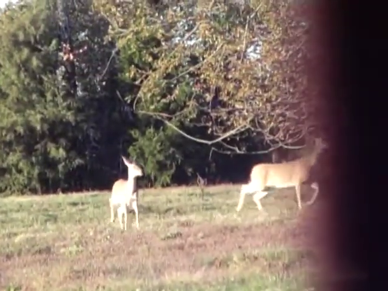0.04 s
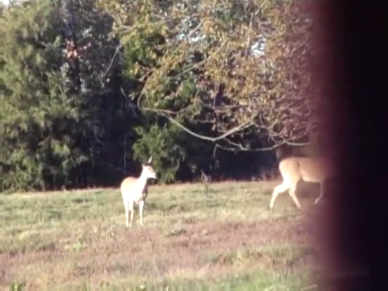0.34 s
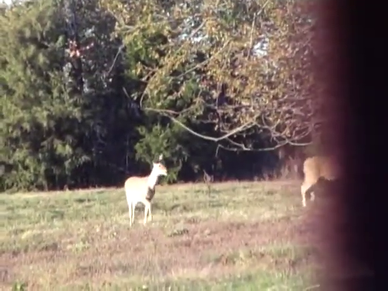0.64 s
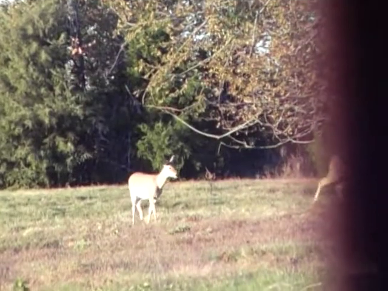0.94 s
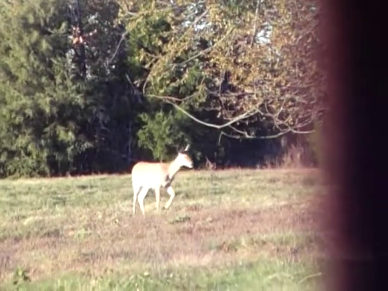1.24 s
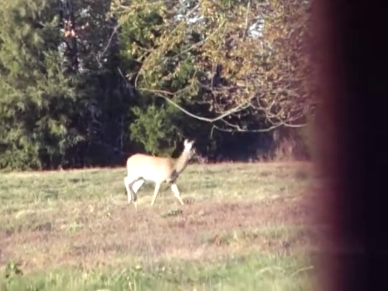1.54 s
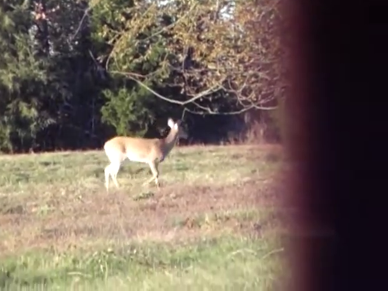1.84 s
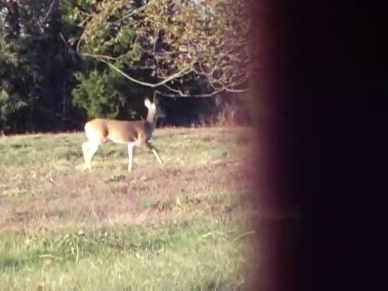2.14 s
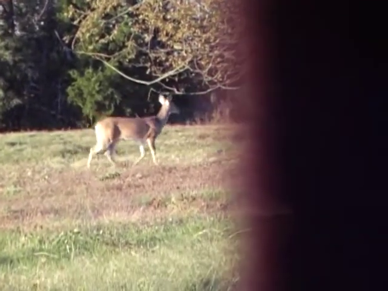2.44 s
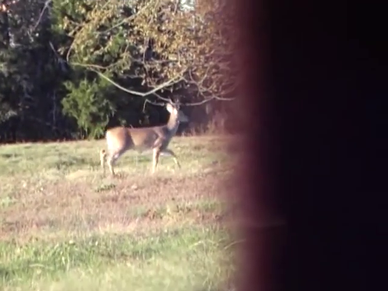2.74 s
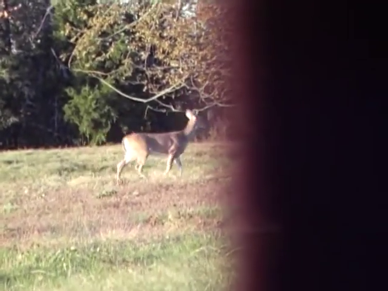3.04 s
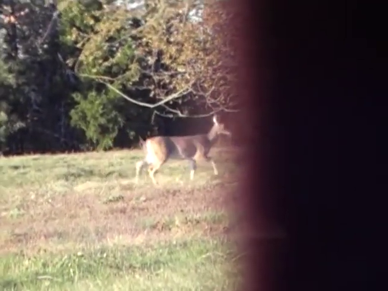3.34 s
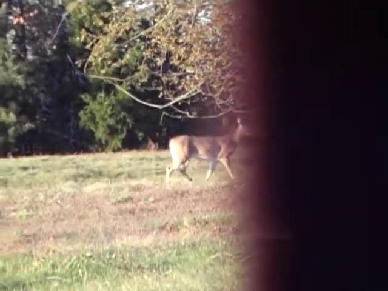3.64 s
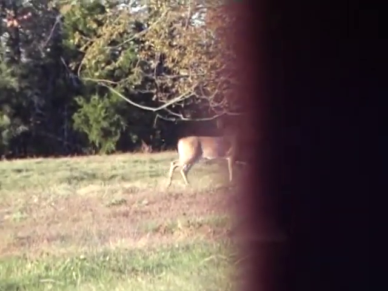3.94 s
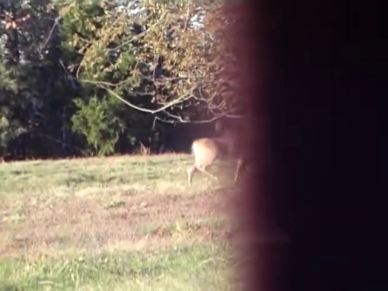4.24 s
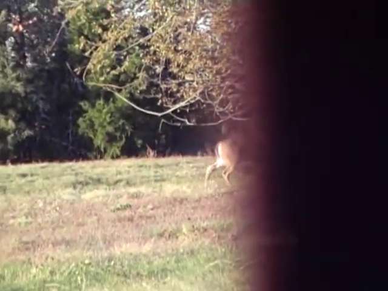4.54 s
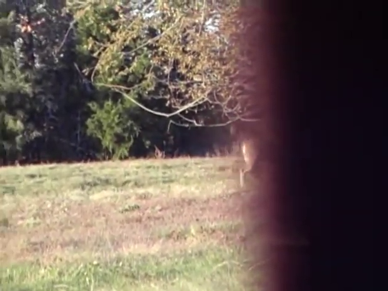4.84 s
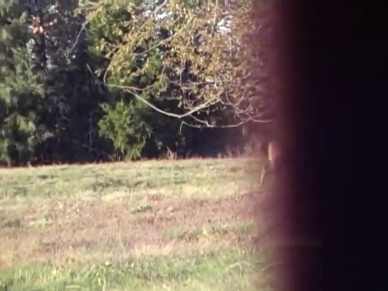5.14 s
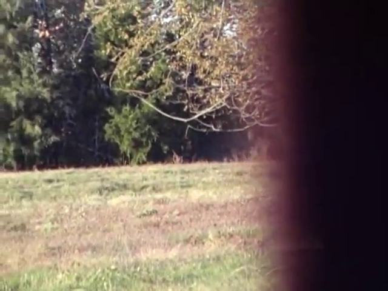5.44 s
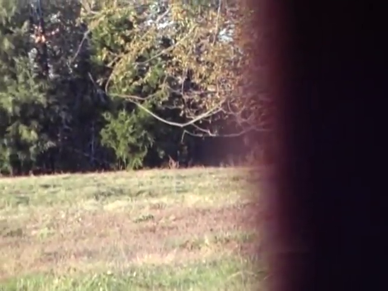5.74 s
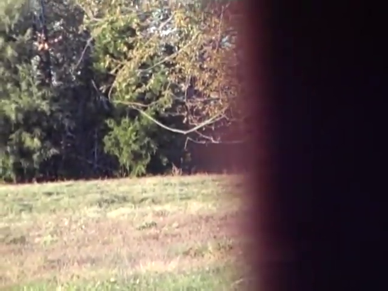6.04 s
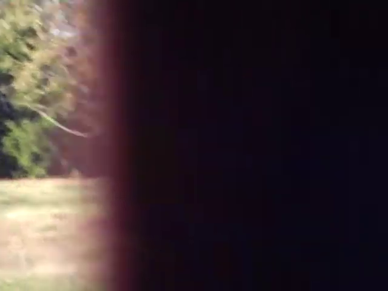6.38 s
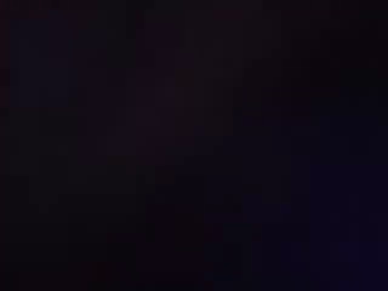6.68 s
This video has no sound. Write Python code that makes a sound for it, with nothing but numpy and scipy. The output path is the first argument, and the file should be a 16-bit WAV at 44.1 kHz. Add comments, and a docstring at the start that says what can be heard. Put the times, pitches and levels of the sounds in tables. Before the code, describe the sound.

Nasal bird calls and faint twittering over a low outdoor rumble, with light camera handling and a closing rustle of tent fabric.

```python
"""Low outdoor rumble, mic hiss and camcorder hum, in a fabric hunting blind at the edge of a wood.
Sleeves stir; hands rub, tick and knock on the camera. A small bird mews three times, its harmonics
sliding through throat resonances. A far bird yelps in the echo of the trunks; others twitter, whistle
and chip in gliding tones. At the end the camera drags along the tent: the weave slips over the mic
ports in a hiss and a scrape, and a crease snaps."""
import sys
import numpy as np
from scipy import signal
from scipy.fft import rfft, irfft, next_fast_len
from scipy.io import wavfile
from scipy.ndimage import map_coordinates

SR = 44100
rng = np.random.default_rng(int(sys.argv[2]) if len(sys.argv) > 2 else 0)


def dump(signal):
    """Clip the signal to [-1, 1] and save it as 16-bit WAV at the path in sys.argv[1]."""
    limited = np.clip(np.atleast_2d(signal).T, -1, 1)
    pcm = np.round(limited * 32767).astype(np.int16)
    wavfile.write(sys.argv[1], SR, pcm)


N = 304731
TIME = np.arange(N) / SR

# still air, mic hiss: f/Hz, gain/dB
AIR_SPECTRUM = [(15, -40), (25, -23), (54, -3.5), (113, -2.5), (146, -3.5), (224, -9.5), (248, -14),
                (310, -12.5), (388, -14.5), (493, -15), (743, -14.5), (852, -16), (897, -17.5), (1220, -12),
                (1500, -33), (1950, -46), (3300, -120)]
HISS_SPECTRUM = [(1000, -4.5), (1500, 4), (2100, 0.5), (3000, -0.5), (4500, 0.5), (6500, -2.5), (7800, -8),
                 (9200, -7.5), (10500, -10.5), (15500, -14)]
# width of air and hiss: f/Hz, side minus mid/dB
AIR_WIDTH = [(60, -19), (160, -15.5), (330, -5.5), (1200, -9.5), (2000, -1), (6000, -4), (9000, 8),
             (11000, 0.5), (15000, -1)]
# camera hum and whine: f/Hz, level/dB
HUM_TONES = [(111, -68), (124, -67.5), (179, -70.5), (841, -66.5)]
# stirring sleeves: t/s, level/dB
SLEEVE_LEVELS = [(0, -65), (.22, -64), (.3, -72), (.6, -80), (.95, -71), (1.2, -63.5), (1.75, -63.5),
                 (1.95, -72.5), (2.12, -64), (2.6, -69), (2.75, -64), (3.7, -67.5), (3.9, -64.5),
                 (5.1, -66.5), (5.55, -72.5), (5.8, -67), (6.2, -68.5)]
# stirring sleeves: f/Hz, gain/dB
SLEEVE_SPECTRUM = [(800, -14), (2000, 2.5), (3000, -4.5), (3900, 3.5), (5500, 0.5), (6600, 2), (7600, -11),
                   (11000, -23), (16000, -24)]
# width of cloth at the mic ports: f/Hz, side minus mid/dB
CLOTH_WIDTH = [(300, -22), (1000, -17), (2500, -102), (4500, -22), (6000, -20.5), (7300, -10), (8500, 8),
               (10000, 3.5), (12000, -0.5), (15000, -1)]
# cloth and casing ticks, body knocks: t/s, peak/dB, f/Hz, t60/s
SHARP_TICKS = [(.2325, -39, 4760, 0.024), (1.047, -40, 1995, 0.019), (1.502, -52, 1710, 0.0093),
               (1.773, -30.5, 4970, 0.014), (1.804, -41, 2800, 0.0083), (5.104, -41, 3660, 0.025),
               (6.2897, -28, 5000, 0.0048), (6.5318, -28, 2450, .004), (6.569, -34.5, 1700, .01)]
BODY_KNOCKS = [(.933, -45.5, 597, 0.023), (1.003, -38.5, 400, 0.024), (1.048, -51, 800, 0.011),
               (1.502, -43, 450, 0.012), (1.52, -41, 412, 0.0068), (2.214, -39.5, 730, 0.017),
               (3.338, -47, 646, 0.019), (6.283, -43, 527, 0.11), (6.414, -34.5, 930, 0.008),
               (6.628, -32.5, 316, 0.029)]
# mews: t/s, length/s, start f/Hz, mid f/Hz, end f/Hz, level before throat/dB, flutter/dB, release/s
MEW_CALLS = [(0.637, .38, 895, 824.3, 774, -41.5, 1.35, 0.025),
             (1.367, .367, 877, 827, 768, -42, 0.8, .022), (5.35, 0.42, 902, 831, 795, -46, 2, 0.12)]
# mewing bird's throat resonances: f/Hz, width/Hz, gain/dB
THROAT_MODES = [(1565, 450, -24), (2410, 110, -20), (2577, 95, -20), (2990, 260, -9), (3273, 166, -3),
                (3960, 400, -26), (4900, 490, -24.5), (5230, 140, -23), (6420, 260, -28)]
# shifting grip: t/s, level/dB
GRIP_LEVELS = [(.8, -70), (1.03, -57.5), (1.2, -56), (1.42, -63), (1.53, -58), (1.9, -82)]
# shifting grip: f/Hz, gain/dB
GRIP_SPECTRUM = [(100, -10), (220, -6), (400, -1), (700, -2), (1100, -9.5), (2500, -23), (6000, -27),
                 (12000, -42)]
# far yelps: t/s, fall/s, top f/Hz, source level/dB
YELP_CALLS = [(.925, 0.045, 1383, -54), (1.218, 0.063, 1450, -47.5), (1.584, 0.083, 1450, -47.5),
              (1.932, 0.22, 1500, -58), (2.319, .19, 1422, -47.5), (2.738, 0.18, 1418, -48.5),
              (3.198, 0.19, 1405, -50.5)]
# rising chips: t/s, level/dB
CHIP_CALLS = [(3.132, -52.5), (3.657, -63), (4.127, -54), (4.604, -57), (5.726, -57)]
# songbird notes: t/s, length/s, start f/Hz, end f/Hz, level/dB, burr/share of pitch
WHISTLE_NOTES = [(2.4, 0.2, 3170, 2940, -64.5, 0.023), (3.349, 0.033, 3060, 3255, -53.5, 0.0072),
                 (3.379, 0.095, 4300, 3910, -47.5, 0.0048), (3.463, 0.033, 2710, 2720, -59.5, 0.0072),
                 (3.492, 0.083, 3350, 2500, -54, 0.032)]
# tent weave hiss, lower scrape: f/Hz, gain/dB
WEAVE_SPECTRUM = [(2060, -28), (3500, -11), (4190, -9.5), (4630, -5), (6020, 0), (7960, -13), (9420, -16),
                  (11700, -21.5), (15500, -39)]
SCRAPE_SPECTRUM = [(120, -45), (200, -24), (237, -11.5), (355, -9.5), (597, -12), (736, -7.5),
                   (1360, -11.5), (1510, -6), (2200, -6), (2470, -7.5), (2820, -4.5), (4160, -4),
                   (4500, -1), (5850, -21), (9900, -120)]
# resonances of air pockets under the cloth, of the camera shell: f/Hz, width/Hz, gain/dB
POCKET_MODES = [(5000, 300, -17), (5500, 220, -18), (6600, 250, -11.5)]
SHELL_MODES = [(1500, 250, -13), (2500, 140, 0)]
# mic ports against the tent: f/Hz, left minus right/dB
PORT_BALANCE = [(3000, -1), (4800, 0), (5500, -3), (7300, -8.5), (9000, 3), (11000, 6.5), (14000, 3)]


def undb(db):
    """Decibels to gain."""
    return 10 ** (np.asarray(db) / 20)


def unit(x):
    """Scale to rms 1."""
    return x / np.sqrt(np.mean(x ** 2))


def noise():
    """White noise."""
    return rng.standard_normal(N)


def walk(rate_hz):
    """Smooth random wander, spread near 1."""
    knots = rng.standard_normal(4096)
    return 1.205 * map_coordinates(knots, [TIME * rate_hz], order=2, mode="wrap")


def decay(t_s, t60_s):
    """Exponential fall, 60 dB per t60."""
    return np.exp(-np.log(1000) * t_s / t60_s)


def fade(times_s, levels_db, edge_s=.0037):
    """Gain along a level curve, silent outside it."""
    inside_s = np.minimum(TIME - times_s[0], times_s[-1] - TIME)
    return undb(np.interp(TIME, times_s, levels_db)) * np.clip(inside_s / edge_s + .5, 0, 1)


def shape(x, spectrum, power=1):
    """Filter by an outline of f/Hz, gain/dB."""
    hz, db = np.transpose(spectrum)
    size = next_fast_len(N)
    bins_hz = np.maximum(np.arange(size // 2 + 1) * SR / size, 1)
    gain = undb(power * np.interp(np.log(bins_hz), np.log(hz), db))
    return irfft(rfft(x, size) * gain, size)[:N]


def resonate(x, hz, width_hz):
    """One resonance, gain 1 at its centre."""
    return signal.lfilter(*signal.iirpeak(min(hz, .45 * SR), max(hz / width_hz, .5), SR), x)


def place(x, pan_db):
    """Pan; positive is left."""
    return x * undb(np.array([[pan_db], [-pan_db]]) / 2)


def ports(common, apart, spectrum, width):
    """Two mic ports: a shared signal plus and minus a side signal."""
    mid = unit(shape(common, spectrum))
    side = shape(unit(shape(apart, spectrum)), width)
    return np.array([mid + side, mid - side])


def background(air_db=-57.5, hiss_db=-66):
    """Outdoor rumble and mic hiss."""
    air = ports(noise(), noise(), AIR_SPECTRUM, AIR_WIDTH) * undb(air_db + .54 * walk(5.12))
    hiss = ports(noise(), noise(), HISS_SPECTRUM, AIR_WIDTH) * undb(hiss_db)
    return air + hiss


def camera_hum():
    """Four tones, wavering in pitch and level."""
    hum = np.zeros(N)
    for hz, db in HUM_TONES:
        gain = np.sqrt(2) * undb(db + 1.13 * walk(5.5))
        hum += gain * np.sin(2 * np.pi * np.cumsum(hz + 1.58 * walk(12)) / SR)
    return hum


def slips(rate_hz, spread_db):
    """Tiny fibre slips at random moments, a few much larger."""
    sizes = undb(spread_db * np.minimum(rng.exponential(size=N), 5))
    return unit(noise() * sizes * (rng.random(N) < rate_hz / SR))


def sleeves():
    """Clothing fibres slip in little fits."""
    rustle = ports(slips(7000, 1.8), slips(6400, 2), SLEEVE_SPECTRUM, CLOTH_WIDTH)
    fits = undb(2.3 * walk(65))
    return place(rustle * fade(*np.transpose(SLEEVE_LEVELS)) * fits, pan_db=-3)


def contacts(table, width_ratio, cutoff_ratio, push):
    """Ticks or knocks: a push and a dying burst of slips through a broad resonance, dulled above it."""
    out, t = np.zeros(N), TIME[:SR // 10]
    for start_s, peak_db, hz, t60_s in table:
        force = push * (t == 0) + rng.standard_normal(len(t)) * decay(t, t60_s)
        lowpass = signal.butter(4, min(hz * cutoff_ratio, .45 * SR), fs=SR, output="sos")
        hit = signal.sosfilt(lowpass, resonate(force, hz, hz * width_ratio))
        i = int(start_s * SR)
        out[i:i + len(t)] += (undb(peak_db) * hit / np.abs(hit).max())[:N - i]
    return out


def mew(start_s, length_s, start_hz, mid_hz, end_hz, db, flutter_db, release_s,
        attack_s=.028, scoop_s=.015, drop_s=.02):
    """Nasal cry: scoops up, sinks, drops away; harmonic 4 rings as it crosses the throat's main peak."""
    end_s = start_s + length_s
    opening = np.exp(-np.maximum(TIME - start_s, 0) / scoop_s)
    closing = np.exp(-np.maximum(end_s - TIME, 0) / drop_s)
    roughness = np.sqrt(opening + closing)
    pitch_hz = np.interp(TIME, [start_s, start_s + length_s / 2, end_s], [start_hz, mid_hz, end_hz])
    pitch_hz *= 1 - .25 * opening - .14 * closing
    jitter = 1 + (.005 + .0237 * roughness) * walk(400)
    phase = 2 * np.pi * np.cumsum(pitch_hz * jitter) / SR
    effort = np.clip((TIME - start_s) / attack_s, 0, 1) ** 2 * np.clip((end_s - TIME) / release_s, 0, 1)
    voice = np.zeros(N)
    for k in range(2, 9):
        modes = (undb(peak_db) / (1 + (2 * (k * pitch_hz - hz) / width_hz) ** 2)
                 for hz, width_hz, peak_db in THROAT_MODES)
        gain = np.sqrt(sum(mode ** 2 for mode in modes))
        quiver = undb((flutter_db + 1.5 * (1 - gain)) * walk(80))  # steadiest where loudest
        voice += gain * quiver * np.sin(k * phase)
    breath = unit(resonate(resonate(noise(), 2900, 2500), 2900, 2500))
    rasp = breath * roughness * undb(-17)
    return (np.sqrt(2) * voice * effort + rasp) * fade([start_s, end_s], [db, db])


def woods(x, t60_s, build_s, width):
    """Scatter from many trunks: an echo that builds and dies."""
    t = TIME[:2 * SR]
    tail = (1 - np.exp(-t / build_s)) * decay(t, t60_s)
    tail /= np.linalg.norm(tail)
    mid, side = (signal.fftconvolve(x, rng.standard_normal(len(t)) * tail)[:N] for _ in range(2))
    return np.array([mid + width * side, mid - width * side])


def near_bird():
    """Three mews, lightly echoed by the tree line."""
    voice = sum(mew(*call) for call in MEW_CALLS)
    return place(voice, pan_db=.9) + undb(-18.5) * woods(voice, t60_s=1.4, build_s=.03, width=.3)


def grip():
    """Fingers slip on the camera body in a dull rub."""
    rub = unit(shape(slips(1500, 2.3), GRIP_SPECTRUM))
    return rub * fade(*np.transpose(GRIP_LEVELS)) * undb(2 * walk(29.97))


def far_bird(rise_s=.0403, sink_s=.17):
    """Arched yelps from a rattling throat, half lost in the wood's echo."""
    voice, waver = np.zeros(N), 1 + .02 * walk(240)
    for start_s, fall_s, top_hz, db in YELP_CALLS:
        top_s = start_s + rise_s
        rising = np.clip((top_s - TIME) / rise_s, 0, 1)
        sinking = np.clip((TIME - top_s) / sink_s, 0, 1)
        arch = 1 - .18 * rising ** 2 - .24 * sinking ** 1.2
        phase = 2 * np.pi * np.cumsum(top_hz * arch * waver) / SR
        times_s = [start_s, top_s, top_s + fall_s / 3, top_s + fall_s]
        effort = fade(times_s, [db - 5, db, db - 2, db - 7], edge_s=.012)
        voice += effort * (np.sin(phase) + undb(-27) * np.sin(2 * phase))
    rattle_hz = 150 + 50 * walk(60)
    voice *= 1 + .45 * np.sin(2 * np.pi * np.cumsum(rattle_hz) / SR)
    short_echo = woods(voice, t60_s=.14, build_s=.004, width=.1)
    long_echo = woods(resonate(voice, 1380, 800), t60_s=1.9, build_s=.015, width=.06)
    return undb(-1) * voice + undb(-10) * short_echo + undb(-2.5) * long_echo


def glide(start_s, length_s, start_hz, end_hz, db, waver, attack_s, change_db, release_s=.005):
    """Sine note: slides fast, settles on its end pitch; the level ramps after the attack."""
    out, span = np.zeros(N), slice(int(start_s * SR), int((start_s + length_s) * SR))
    t = TIME[span] - TIME[span][0]
    hz = end_hz + (start_hz - end_hz) * np.clip(1 - t / length_s, 0, 1) ** 2.1
    gate = np.clip(np.minimum(t / attack_s, (length_s - t) / release_s), 0, 1)
    gain = undb(db + change_db * np.maximum(t - attack_s, 0) / length_s)
    out[span] = np.sqrt(2) * gate * gain * np.sin(2 * np.pi * np.cumsum(hz * waver[span]) / SR)
    return out


def tiny_birds(twitter_span_s=(2.1, 5.2), twitter_hz=6500, twitter_db=-67.5, chip_hz=(5850, 7800)):
    """Faint quick twitter under a few buzzy upward chips."""
    voice, buzz = np.zeros(N), 1 + .045 * walk(580)
    for slot_s in np.linspace(*twitter_span_s, 34):
        late, high, loud = rng.standard_normal(3)
        hz, db = twitter_hz * (1 + .022 * high), twitter_db + 2 * loud
        voice += glide(slot_s + .03 * late, .022, hz, hz, db, buzz, attack_s=.005, change_db=1)
    for start_s, db in CHIP_CALLS:
        voice += glide(start_s, .028, *chip_hz, db, buzz, attack_s=.00082, change_db=-19)
    echo = undb(-8) * woods(voice, t60_s=.28, build_s=.013, width=.6)
    return place(voice + echo, pan_db=-5.5)


def songbirds():
    """One faint whistle, then a quick liquid phrase, partly burry, with echo."""
    wander = walk(400)
    voice = sum(glide(*note, 1 + burr * wander, attack_s=.024, change_db=-14)
                for *note, burr in WHISTLE_NOTES)
    return voice + undb(-9) * woods(voice, t60_s=.46, build_s=.014, width=.26)


def tent_drag(contact_s=6.411, approach_db_per_s=128, press_s=.27):
    """Weave closes on the ports and hisses; rising pressure favours a lower scrape that rings the shell."""
    approach = undb(-approach_db_per_s * np.maximum(contact_s - TIME, 0))
    pressure = 1 - np.exp(-np.maximum(TIME - contact_s, 0) / press_s)
    catching = undb(.6 * walk(150))
    hiss = ports(slips(16000, 1.3), slips(16000, 1.3), WEAVE_SPECTRUM, CLOTH_WIDTH)
    # pockets ring more or less as the folds shift
    hiss += sum(undb(db + 4.6 * walk(25)) * resonate(hiss, hz, width_hz)
                for hz, width_hz, db in POCKET_MODES)
    scrape = ports(slips(6000, 1.5), slips(6000, 1.5), SCRAPE_SPECTRUM, CLOTH_WIDTH)
    scrape += sum(undb(db) * resonate(scrape, hz, width_hz) for hz, width_hz, db in SHELL_MODES)
    rub = hiss * undb(-38 + 3.5 * pressure) + scrape * undb(-47 + 5 * pressure)
    return approach * catching * rub


def covered_ports(cloth):
    """Against the tent, each port takes its own colour."""
    left, right = cloth
    return np.array([shape(left, PORT_BALANCE, power=.5), shape(right, PORT_BALANCE, power=-.5)])


def crease_snap(start_s=6.532, ring_hz=5300, attack_s=.00012, t60_s=.0044):
    """A stiff crease lets go over the mic: crackle and a brief ring."""
    t = np.maximum(TIME - start_s, 0)
    ring = .91 * np.sin(2 * np.pi * ring_hz * t)
    crackle = .48 * unit(shape(noise(), WEAVE_SPECTRUM))
    return undb(-12) * np.minimum(t / attack_s, 1) * decay(t, t60_s) * (ring + crackle)


def scene():
    """Birds outside, hands and cloth close by."""
    bed = background() + camera_hum()
    ticks = contacts(SHARP_TICKS, width_ratio=.68, cutoff_ratio=1.2, push=6)
    knocks = contacts(BODY_KNOCKS, width_ratio=.98, cutoff_ratio=2.04, push=9)
    handling = sleeves() + ticks + grip() + knocks
    birds = near_bird() + far_bird() + tiny_birds() + songbirds()
    return bed + handling + birds + covered_ports(tent_drag() + crease_snap())


def record(dry, cutoff_hz=15700):
    """Camcorder's steep low-pass."""
    return signal.sosfilt(signal.ellip(10, .1, 80, cutoff_hz, fs=SR, output="sos"), dry)


dry = scene()
out = record(dry)
dump(out)
```